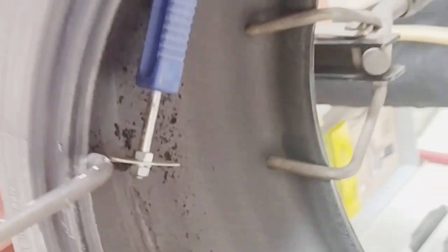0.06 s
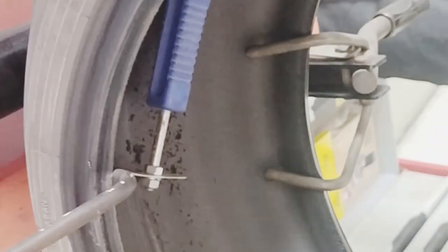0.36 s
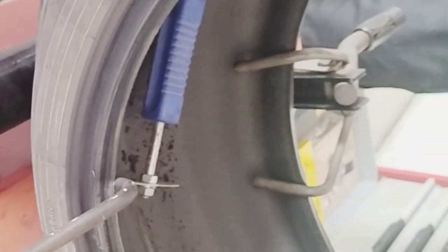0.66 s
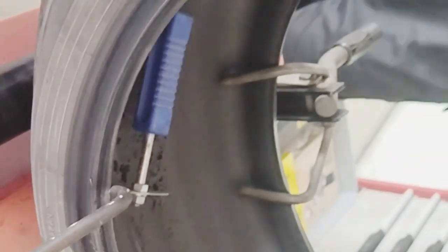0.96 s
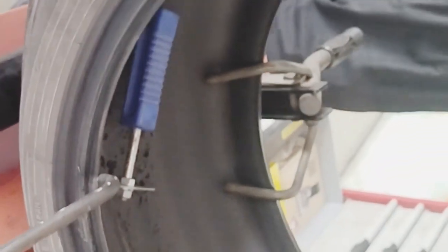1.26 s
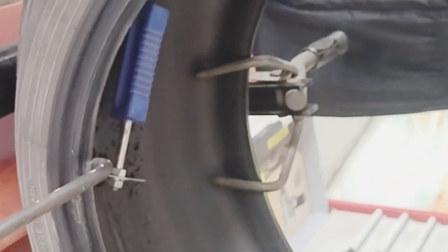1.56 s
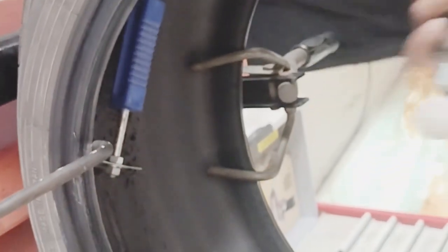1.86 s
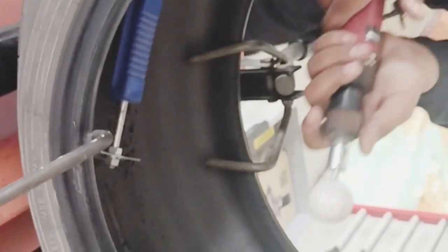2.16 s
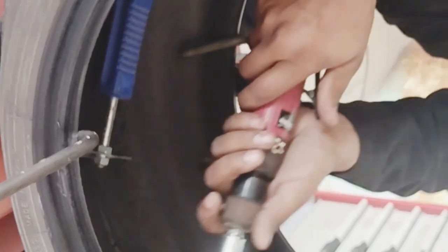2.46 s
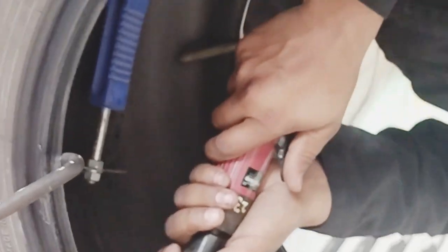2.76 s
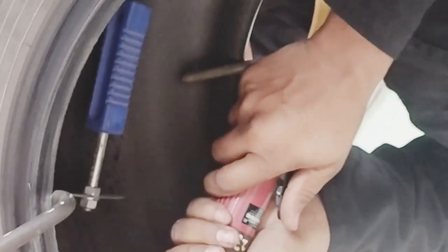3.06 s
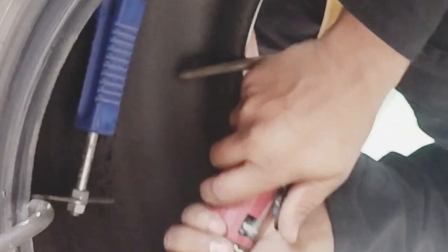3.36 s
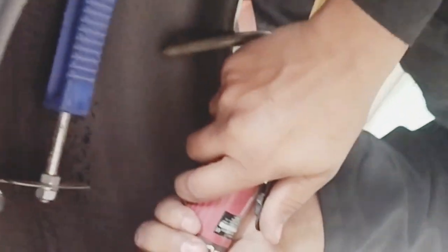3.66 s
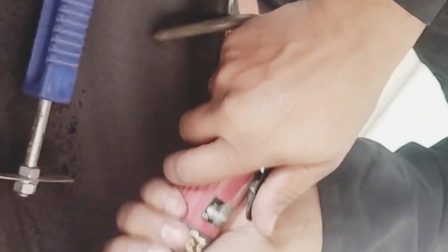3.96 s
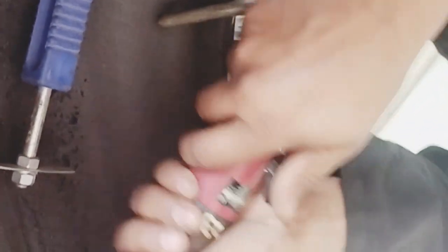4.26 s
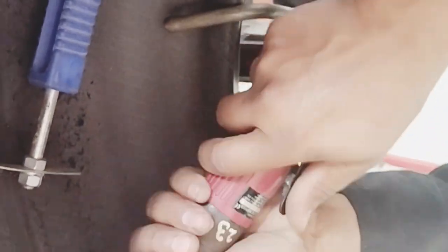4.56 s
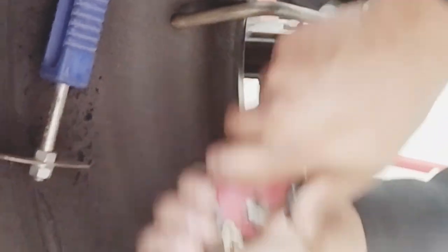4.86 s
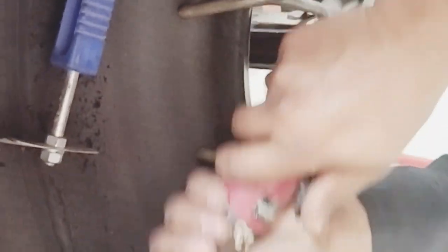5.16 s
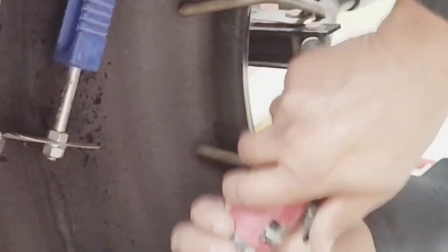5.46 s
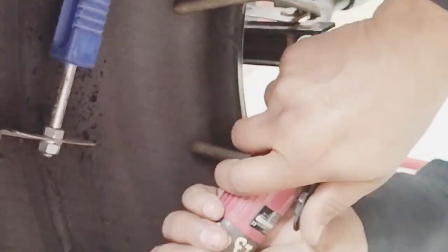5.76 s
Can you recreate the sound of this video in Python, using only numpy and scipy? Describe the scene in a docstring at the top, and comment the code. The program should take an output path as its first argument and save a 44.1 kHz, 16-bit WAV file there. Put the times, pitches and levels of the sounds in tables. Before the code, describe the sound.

A low drone fills a large, echoing workshop. In the first second there are two or three light metal clicks, faint puffs of escaping air and a soft hollow hum. At 1 second a hand-held air grinder sputters up to a high, hissing whine, cutting off at about 1.6 seconds with a small puff; its tone lingers in the room. A faint low rumble follows. At about 3 seconds the grinder starts again, loud and close to the microphone, a steady whine over a jet of air, and the drone recedes. From about 3.5 seconds the stone presses on the rubber inside a tyre: the pitch sinks a little, then wavers and flutters with each stroke, joined by a gritty rasp and fine chatter. The grinding continues to the end, just past 6 seconds.

```python
"""Metal clicks and a little air escapes in a large, echoing workshop. An air die grinder is blipped once,
then started again and pressed to the rubber inside a tyre, where it slows and wavers.
Four vanes chop the exhaust into a whine over the hiss of the jet; the stone rasps and chatters.
The phone's gain control ducks the drone of the shop while the grinder runs."""
import sys
import numpy as np
from scipy import signal
from scipy.fft import rfft, irfft
from scipy.io import wavfile
from scipy.ndimage import uniform_filter1d, minimum_filter1d

SR = 44100
rng = np.random.default_rng(int(sys.argv[2]) if len(sys.argv) > 2 else 0)


def wrap_up_sound(samples):
    """Save the sound to the file named by the first command line argument, as 16-bit audio."""
    columns = np.atleast_2d(samples).T
    # keep every value between -1 and 1, then stretch to whole-number steps
    tamed = np.clip(columns, -1, 1)
    steps = np.round(tamed * 32767).astype(np.int16)
    wavfile.write(sys.argv[1], SR, steps)


N = 265923
T = np.arange(N) / SR

# lever presses: (down [s], up [s], distance loss scale [dB], speed kick [0-1], air burst [dB])
PRESSES = [(1.005, 1.603, -12.5, 0.0, -58), (2.955, 6.5, -13, 0.18, -38.5)]
# motor running free: (time [s], vane rate [Hz])
BLIP_RATE = [(1.12, 1208), (1.144, 1190), (1.6, 1200)]
PORT_HZ, PORT_WIDTH_HZ = 3200, 230  # exhaust port resonance


def undb(db):
    """Decibels to gain."""
    return 10 ** (np.asarray(db) / 20)


def curves(*tables):
    """Merge tables by time; interpolate each column per sample."""
    times, *columns = np.transpose(sorted(tuple(row) for table in tables for row in table))
    return [np.interp(T, times, column) for column in columns]


def unit(x):
    """Scale stereo to a mid of rms 1."""
    return x / np.std(x.mean(axis=0))


def place(db):
    """Left and right gains for a level difference."""
    gains = undb(np.array([db, -db]) / 2).reshape(2, -1)
    return gains / gains.mean(axis=0)


def walk(rate_hz):
    """Random steps, slewed twice; spread near 1."""
    hold = int(SR / rate_hz)
    steps = np.repeat(rng.standard_normal(N // hold + 1), hold)
    return 1.3 * uniform_filter1d(uniform_filter1d(steps, hold), hold)[:N]


def ramp(start_s, length_s):
    """Linear rise, 0 to 1."""
    return np.clip((T - start_s) / length_s, 0, 1)


def strike(start_s, t60_s):
    """Envelope: instant onset, decay."""
    return (T >= start_s) * undb(-60 * np.maximum(T - start_s, 0) / t60_s)


def swell(start_s, attack_s, length_s, t60_s):
    """Envelope: linear attack; decay begins length_s after the start."""
    return ramp(start_s, attack_s) * undb(-60 * np.maximum(T - start_s - length_s, 0) / t60_s)


def resonance(hz, centre_hz, width_hz):
    """Flat-topped share 0-1 of a resonance's lift."""
    return 1 / (1 + ((hz - centre_hz) / width_hz) ** 6)


def diffuse(alike_hz=900):
    """Spectrum of stereo white noise, alike in the bass, unrelated in the treble."""
    hz = np.fft.rfftfreq(N, 1 / SR) + 1
    alike = 1 / (1 + (hz / alike_hz) ** 4)
    mid, side = rfft(rng.standard_normal((2, N)))
    return hz, mid * np.sqrt(1 + alike) + side * np.sqrt(1 - alike) * np.array([[1], [-1]])


def noise(spectrum, flow=1):
    """Stereo noise, pulsed by its flow, then coloured per side."""
    hz, white = diffuse()
    pulsed = rfft(irfft(white, N) * flow)
    points_hz, *sides_db = np.transpose(spectrum)
    colour = undb([np.interp(np.log(hz), np.log(points_hz), db) for db in sides_db])
    return unit(irfft(pulsed * colour, N))


def resonant(modes):
    """Noise ringing in a few resonances."""
    hz, white = diffuse()
    power = sum(undb(db) ** 2 / (1 + ((hz - f * f / hz) / width / 0.81) ** 2) ** 2
                for f, width, db in modes)
    return unit(irfft(white * np.sqrt(power), N))


def shop_drone(level_db=-46.5):
    """Low, slightly wavering drone of the shop."""
    # (frequency [Hz], left [dB], right [dB])
    spectrum = [(25.46, -26, -37), (60, -27, -31), (91.4, 6.5, 3.5), (127, -6.5, -0.5), (275, -10, -8),
                (490, -18, -6), (894, -16, -17), (2160, -21.5, -30), (3200, -26, -40), (4500, -65, -53),
                (5930, -25, -38), (9200, -51, -31), (15000, -28, -71)]
    return noise(spectrum) * undb(level_db + walk(5.6))


def air_leak(puff_db=-1, sag_db_per_s=48.5, seep_db=-62.5):
    """Air escapes in sagging puffs over a constant seep."""
    # (frequency [Hz], left [dB], right [dB])
    spectrum = [(199.5, -30, -41), (970, -38, -38), (1700, -11, -14), (2280, -3.5, -8), (2930, -11, -12),
                (3670, -2, -7), (4470, -8, -19), (6120, -1, -15), (7500, -15, -17), (9400, -38, -18.5),
                (11220, -34, -48), (14700, -31, -39)]
    # (start [s], length [s], relative level [dB])
    leaks = [(-0.03, 0.11, -45.5), (0.055, 0.58, -31), (0.32, 0.22, -38), (0.83, 0.157, -49),
             (2.903, 0.084, -37)]
    puffs = [swell(s, 0.06, length_s, t60_s=0.25) * undb(db - sag_db_per_s * np.maximum(T - s, 0))
             for s, length_s, db in leaks]
    return noise(spectrum) * (undb(puff_db) * np.linalg.norm(puffs, axis=0) + undb(seep_db))


def metal_clicks(level_db=-3.5):
    """Short, bright clicks of metal."""
    # (frequency [Hz], left [dB], right [dB])
    spectrum = [(200, -26, -36), (970, -31, -43), (1500, -6.5, -8.5), (2630, -14.5, -18), (3700, -5.5, -9),
                (5600, 5.5, -6), (7500, -17, -12), (10500, -31, -32), (13800, -17, -33)]
    # (time [s], relative level [dB], t60 [s])
    clicks = [(0.0571, -15, 0.042), (0.358, -20.5, 0.036), (0.902, -31.5, 0.031)]
    return noise(spectrum) * sum(undb(db + level_db) * strike(s, t60_s) for s, db, t60_s in clicks)


def hall(x, delay_s=0.0083):
    """Dense echoes, longest in the midrange."""
    # (frequency [Hz], t60 [s], level [dB])
    bands = [(104, 0.87, -39), (440, 1.273, -5), (825, 1.55, -7.5), (1230, 1.28, -8), (2140, 1.52, -14),
             (3300, 1.06, -10.5), (6200, 1.01, -6.5), (9700, 0.71, -10.5), (15000, 0.4, -8)]
    hz, white = diffuse()
    points_hz, t60s, levels_db = np.transpose(bands)
    response = 0
    for share, t60_s, gain in zip(np.eye(len(bands)), t60s, undb(levels_db)):
        band = irfft(white * np.interp(np.log(hz), np.log(points_hz), share), N)
        fade = strike(delay_s, t60_s)
        response = response + gain * band * fade / np.sqrt(np.sum(fade ** 2))
    return signal.fftconvolve(x, response[:, :3 * SR], axes=1)[:, :N]


def hollow_hum(level_db=-39):
    """A hollow hum swells once and fades."""
    # (frequency [Hz], width [Hz], level [dB])
    modes = [(427, 59, -3), (514, 53, -8.5), (640, 97, -10), (1300, 96, -18.5)]
    return resonant(modes) * undb(level_db) * swell(0.17, attack_s=0.3, length_s=0.42, t60_s=1.46)


def lever(spin_up_s=0.083, spin_down_s=0.064, shut_s=0.013, approach_s=0.47):
    """A press opens the valve and spins the rotor up; released, it coasts to rest. Four controls, 0-1."""
    speed = valve = coasting = near = 0
    for down_s, up_s, far_db, kick, _ in PRESSES:
        pressed = T >= down_s
        push = np.maximum(T - down_s, 0) / spin_up_s
        spin_up = push / (1 + push ** 8) ** (1 / 8)
        turning = 1 - ramp(up_s, spin_down_s)
        speed += pressed * turning * (kick + (1 - kick) * spin_up)
        valve += pressed * (1 - ramp(up_s + shut_s, shut_s))
        coasting += ramp(up_s, shut_s / 2) * (turning > 0)
        near += pressed * (turning > 0) * undb(far_db * (1.5 - ramp(down_s, approach_s)))
    return speed, valve, coasting, near


def inside():
    """0 for the blip in the open, 1 from the restart in the tyre."""
    return 1.0 * (T > PRESSES[-1][0])


def coughs(half_length_s=0.0035):
    """The valve snaps open and the starting rotor coughs."""
    # (time [s], level [dB], pitch [Hz])
    pulses = [(1.004, -49, 213), (1.026, -41.5, 336), (1.032, -42, 910), (2.96, -35.5, 235)]
    return sum(undb(db) * np.exp(-((T - s) / half_length_s) ** 2) * np.cos(2 * np.pi * hz * (T - s))
               for s, db, hz in pulses)


def spit(speed, valve, coasting, level_db=-20):
    """Air spits past the vanes until the rotor is up to speed."""
    # (frequency [Hz], width [Hz], level [dB])
    modes = [(330, 190, -8.5), (850, 580, 3), (3230, 790, -11)]
    return resonant(modes) * undb(level_db) * valve * (1 - coasting) * speed * (1 - speed) ** 2


def exhaust(phase, air_db, contact, near, pulsing=0.37, rush_db=-10, muffle_db=29):
    """A jet pulsing with the vanes, a lower rush that hands and tyre muffle, a burst at each press."""
    # both: (frequency [Hz], left [dB], right [dB])
    jet_spectrum = [(99, -34.5, -40.5), (420, -27, -30.5), (810, -35, -36), (1240, -15.5, -18),
                    (1440, -30, -31), (1530, -35, -33), (1705, -10, -10.5), (1830, -42, -40),
                    (1940, -18, -20), (2092, -9, -5), (3500, -1, -5.5), (4250, -4.5, -11.5),
                    (4630, -7.5, -8.5), (5570, 4, -17), (6250, -3, -13), (6880, -9, -11),
                    (8940, -21.5, -10.5), (11300, -21, -27.5), (12900, -17, -36), (16000, -11.5, -19)]
    rush_spectrum = [(100, -57, -61), (249.3, -37, -34), (463, -33, -23), (587, 7, 10.5), (1170, 11.5, 7.5),
                     (1550, 12, -7), (1880, 9.5, 14.5), (3300, 12.5, -25), (4800, 4, -50),
                     (11810, -99, -63)]
    jet = noise(jet_spectrum, flow=1 + pulsing * np.sin(phase))
    jet *= undb(air_db - 5.5 * contact + 1.37 * walk(40))
    rush = noise(rush_spectrum) * undb(air_db + rush_db - muffle_db * contact)
    bursts = sum(undb(db) * swell(down_s, attack_s=0.07, length_s=0.02, t60_s=0.39)
                 for down_s, *_, db in PRESSES)
    return near * (jet + rush) + noise(rush_spectrum) * bursts


def whine(speed, coasting, air_db, contact, stutter=0.0393, chatter_depth=0.01):
    """Four vanes chop the air, stuttering at low speed. Gives the tone and the vane phase."""
    # motor in the tyre: (time [s], vane rate [Hz])
    work_rate = [(3.082, 1182), (3.35, 1178), (3.48, 1152), (3.58, 1113), (3.68, 1098), (3.8, 1090),
                 (3.898, 1046), (4.081, 1034), (4.22, 1056), (4.279, 1050), (4.341, 1022), (4.431, 1050),
                 (4.531, 1070), (4.59, 1032), (4.67, 1047), (4.743, 1088), (4.83, 1084), (4.92, 1096),
                 (5.0, 1034), (5.1, 1096), (5.172, 1087), (5.209, 1104), (5.34, 1038), (5.44, 1095),
                 (5.52, 1072), (5.581, 1070), (5.63, 1037), (5.72, 1098), (5.821, 1071), (5.93, 1078),
                 (6.02, 1054)]
    hz = speed * curves(BLIP_RATE, work_rate)[0]
    slow = np.clip(1 - hz / 1000, 0, 1)
    first_db, second_db, third_db = harmonic_levels(hz, slow, coasting)
    third_db, third_pan_db = hand_strokes(third_db)
    bounce = stone_chatter(hz, contact)
    waver = chatter_depth * bounce + 0.00217 * contact * walk(120) + 0.000654 * walk(25)
    jitter = (0.0008 + stutter * slow * (2.2 - 1.71 * inside())) * walk(900)  # most from cold
    hz = hz * (1 + waver + jitter)
    phase = 2 * np.pi * np.cumsum(hz) / SR
    first_db += 10 * slow * walk(300) - 2.44 * contact  # sputters at low speed
    second_db += (0.57 + 4.5 * contact) * walk(60) - 4.4 * contact
    third_db += 0.5 * contact * walk(70) - 2 * bounce
    # standing waves in the tyre put left and right out of step and shift the balance
    skew_rad = np.array([[-0.5], [0.5]]) * (0.5 + 1.59 * contact)
    tone = undb(first_db) * np.sin(phase + 1.3 * skew_rad) * place(2.5 - 6.2 * contact)
    tone += undb(second_db) * np.sin(2 * phase + skew_rad) * place(3.8 - 4.2 * contact)
    tone += undb(third_db) * np.sin(3 * phase + 0.27 * skew_rad) * place(third_pan_db)
    tone += overtones(hz, phase, slow, air_db, contact)
    hum = stone_hum(phase, air_db, contact)
    return np.sqrt(2) * (tyre_echo(tone, contact) + hum), phase


def harmonic_levels(hz, slow, coasting):
    """Levels [dB] of vane harmonics 1-3, set by speed and the exhaust's resonances."""
    # the tone sinks at a crawl and dies with the last pressure, before the rotor stands
    crawl_db = -39 * slow ** 3 - 22 * coasting * slow ** 2
    starved = np.clip(4 * slow, 0, 1)
    # upper harmonics: weak until pressure builds, rattling as the rotor coasts
    upper_db = crawl_db - 4 * starved + 4 * coasting
    # the coasting rotor puffs through the exhaust's low resonance
    puff_db = coasting * (12.5 * starved + 7 * resonance(hz, 850, width_hz=110))
    # the second harmonic sings near free speed, weakly at first
    singing = ramp(1.32, 0.051)
    sing_db = np.where(inside(), 17, 7 + 11.5 * singing) * resonance(2 * hz, 2385, width_hz=78)
    # in the tyre the port faces the phone and the third harmonic carries better
    port_db = np.where(inside(), 11, 7) * resonance(3 * hz, PORT_HZ, PORT_WIDTH_HZ)
    deeper_db = 4 * ramp(4.29, 0.29)  # deeper in, the second gains on the first
    first_db = -26.5 - 4.5 * (1 - singing) + crawl_db + 3 * starved + puff_db - deeper_db
    second_db = -35.5 + upper_db + sing_db + exhaust_ring_db(2 * hz, slow) + deeper_db
    third_db = -32.5 + 5.5 * inside() + upper_db + port_db
    return first_db, second_db, third_db


def overtones(hz, phase, slow, air_db, contact, port_db=17, edge_db=3.5):
    """Vane harmonics 4-7 flare in the exhaust's resonances; the rubbing stone smears them into hiss."""
    # re air level: (order, in the open [dB], in the tyre [dB], at full contact [dB])
    orders = [(4, -15, -22.5, -13.5), (5, -15, -7, -17.5), (6, -21, -19.5, -15.5), (7, -37, -22, -36)]
    tone = 0
    for order, open_db, inside_db, contact_db in orders:
        db = np.where(inside(), inside_db, open_db) * (1 - contact) + contact_db * contact
        db += port_db * resonance(order * hz, PORT_HZ, PORT_WIDTH_HZ)
        db += edge_db * resonance(order * hz, 6450, width_hz=340)
        db += exhaust_ring_db(order * hz, slow)
        smear_rad = 0.9 * contact * walk(300)
        flicker_db = (1.5 + 4.2 * contact) * walk(30)
        tone += undb(air_db + db + flicker_db) * np.sin(order * phase + smear_rad)
    return tone * place(9)


def stone_hum(phase, air_db, contact, level_db=-34):
    """The unbalanced stone hums once a turn, unsteadily."""
    shaft_rad = phase / 4 + 0.55 * walk(70)
    return undb(air_db + level_db + 15.6 * contact + 2 * walk(40)) * np.sin(shaft_rad)


def vent(level_db=-17):
    """Trapped air vents as the blip ends."""
    # (frequency [Hz], width [Hz], level [dB])
    modes = [(1230, 640, -1.5), (2150, 960, -9), (2750, 1600, -4)]
    return resonant(modes) * undb(level_db) * strike(PRESSES[0][1], t60_s=0.11)


def echo_swells():
    """The blip's lowest harmonics hang in the hall, each swelling and fading on its own."""
    # (time [s], half length [s], harmonic, level [dB])
    swells = [(1.863, 0.054, 1, -25), (2.094, 0.11, 1, -28), (2.634, 0.03, 1, -50),
              (2.827, 0.053, 1, -49.5), (1.748, 0.018, 2, -14), (1.892, 0.04, 2, -13.5),
              (1.982, 0.03, 2, -19), (2.115, 0.04, 2, -20.5), (2.21, 0.049, 2, -21.5),
              (2.334, 0.028, 2, -45), (2.491, 0.03, 2, -40.5), (2.628, 0.035, 2, -42),
              (1.877, 0.05, 3, -24), (2.03, 0.054, 3, -40), (2.243, 0.037, 3, -48), (2.446, 0.06, 3, -63)]
    blip_hz = BLIP_RATE[-1][1]
    chord = 0
    for s, half_length_s, order, db in swells:
        envelope = undb(db + 1.5 * walk(37)) * np.exp(-((T - s) / half_length_s) ** 2)
        chord += envelope * np.sin(2 * np.pi * order * blip_hz * T)
    return np.sqrt(2) * chord * place(3.8)


def carry_rumble(level_db=-40):
    """Low rumble as the grinder is carried into the tyre."""
    # (frequency [Hz], width [Hz], level [dB])
    modes = [(100.16, 19, 2.5), (174, 78, -2.5), (300, 1200, -13), (473, 17, 1.5)]
    return resonant(modes) * undb(level_db) * swell(2.1, attack_s=0.43, length_s=0.9, t60_s=0.29)


def exhaust_ring_db(hz, slow):
    """At the restart, harmonics of slow, separate puffs ring the exhaust as they sweep past."""
    # (frequency [Hz], width [Hz], lift [dB])
    modes = [(1210, 120, 16), (2630, 240, 11), (3200, 57, 6.5)]
    lift_db = sum(db * resonance(hz, f, width) for f, width, db in modes)
    return inside() * np.clip(5 * slow, 0, 1) * lift_db


def tyre_echo(x, contact, t60_s=0.035, echo_db=-13):
    """Sound bounces inside the casing, so pitch changes make the level flutter."""
    bounces = (rng.standard_normal((2, N)) * strike(0.00098, t60_s))[:, :SR // 8]
    bounces /= np.sqrt(np.sum(bounces ** 2, axis=1, keepdims=True))
    return x + undb(echo_db) * signal.oaconvolve(x * contact, bounces, axes=1)[:, :N]


def stone_rasp(air_db, contact, rasp_db=-6.5, grit_db=-19):
    """The stone rasps on rubber; a narrow, gritty scrape comes and goes as it bites."""
    # (frequency [Hz], width [Hz], level [dB])
    modes = [(2660, 170, 9), (3620, 360, 6), (5580, 2400, 8), (6140, 560, 5)]
    rasp = resonant(modes) * undb(air_db + rasp_db + 0.91 * walk(60) + walk(9))
    grit = resonant([(4090, 320, 0)]) * undb(air_db + grit_db + 3.3 * walk(60) + 4.4 * walk(6.5))
    return (rasp + grit) * contact * place(28)


def stone_chatter(vane_hz, contact, chatter_hz=30, below_hz=1105, span_hz=60):
    """The stone bounces on the rubber, harder as load drags the motor down."""
    load = contact * np.clip((below_hz - vane_hz) / span_hz, 0.3, 1)
    rate_hz = chatter_hz * (1 + 0.207 * walk(28))
    return load * np.sin(2 * np.pi * np.cumsum(rate_hz) / SR) * (1 + 0.28 * walk(4.9))


def hand_strokes(third_db, rest_pan_db=12.5, trim_db=-0.5):
    """Strokes through the tyre's standing waves take over the third harmonic's level and balance."""
    # (time [s], level [dB], left minus right [dB])
    strokes = [(3.5, -28, 18), (3.56, -16, 12), (3.59, -17.5, 0.5), (3.77, -14.5, 17), (3.94, -14, -2),
               (4.07, -18, 0.5), (4.12, -15, 11.5), (4.26, -12.5, 3), (4.35, -17.5, 6), (4.43, -15, 0.0),
               (4.47, -14.5, 13), (4.57, -16, 4.5), (4.71, -18.5, -4.5), (4.83, -17.5, 27),
               (4.91, -17.5, 16), (5.07, -19.5, -11), (5.14, -20, 22), (5.22, -19.5, 24), (5.28, -16, -3),
               (5.37, -22, 10), (5.42, -25.5, -15), (5.46, -20.5, 11), (5.6, -13.5, 4.5), (5.7, -22, -4),
               (5.87, -15.5, 16), (6.02, -15.5, -2)]
    stroke_db, pan_db = curves(strokes)
    stroking = ramp(3.46, 0.074)
    level_db = third_db + stroking * (stroke_db + trim_db - third_db)
    return level_db, rest_pan_db + stroking * (pan_db - rest_pan_db)


def grinder(full_air_db=-23.5, stalled_db=-11.5, spread_db=3.5, shield_db=-9.5):
    """Whine and air, direct and through the hall; less air passes a standing rotor."""
    # stone meeting the rubber: (time [s], contact [0-1])
    pressing = [(3.38, 0.04), (3.6, 0.44), (3.9, 0.61)]
    contact, = curves(pressing)
    speed, valve, coasting, near = lever()
    air_db = full_air_db + stalled_db * (1 - speed) + 20 * np.log10(valve + 1e-6)
    tone, phase = whine(speed, coasting, air_db, contact)
    tone *= near
    hiss = exhaust(phase, air_db, contact, near) + coughs()
    hiss += near * (stone_rasp(air_db, contact) + spit(speed, valve, coasting))
    # the whine spreads all round, the jet points at the phone; the casing shields the hall
    escaping = (undb(spread_db) * tone + hiss) * undb(shield_db * contact)
    return tone + hiss + hall(escaping + vent())  # the vent points away


def scene(grinder_db=23):
    """The grinder close by, small sounds around the blip, the drone of the shop."""
    mix = undb(grinder_db) * grinder() + shop_drone() + echo_swells()
    clicks = metal_clicks()
    return mix + air_leak() + hollow_hum() + carry_rumble() + clicks + hall(clicks)


def record(dry, ceiling_db=-0.9, release_db_per_s=29, low_cut_hz=75, top_hz=15600):
    """Phone: bass cut, gain control that ducks at once on peaks and creeps back, top cut."""
    sound = signal.sosfilt(signal.butter(3, low_cut_hz, "high", fs=SR, output="sos"), dry)
    peak = np.maximum(np.abs(sound).max(axis=0), 1e-6)
    headroom_db = np.minimum(ceiling_db - 20 * np.log10(peak), 0)
    headroom_db = minimum_filter1d(headroom_db, size=4401, origin=2200)  # 0.1 s hold
    # slower release while the sound stays loud
    rise_db = np.cumsum(release_db_per_s * np.clip(1 + headroom_db / 8, 0.2, 1)) / SR
    gain_db = np.minimum.accumulate(headroom_db - rise_db) + rise_db
    gain_db = uniform_filter1d(minimum_filter1d(gain_db, size=200), size=200)
    top_cut = signal.ellip(10, 0.2, 80, top_hz, fs=SR, output="sos")
    return signal.sosfilt(top_cut, sound * undb(gain_db))


dry = scene()
out = record(dry)
wrap_up_sound(out)
```